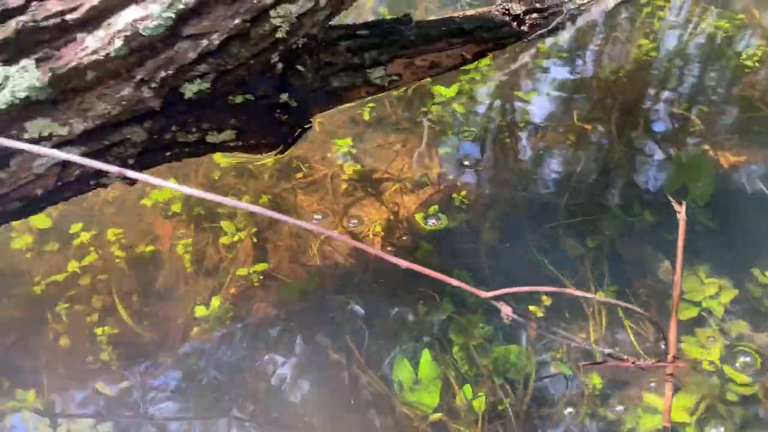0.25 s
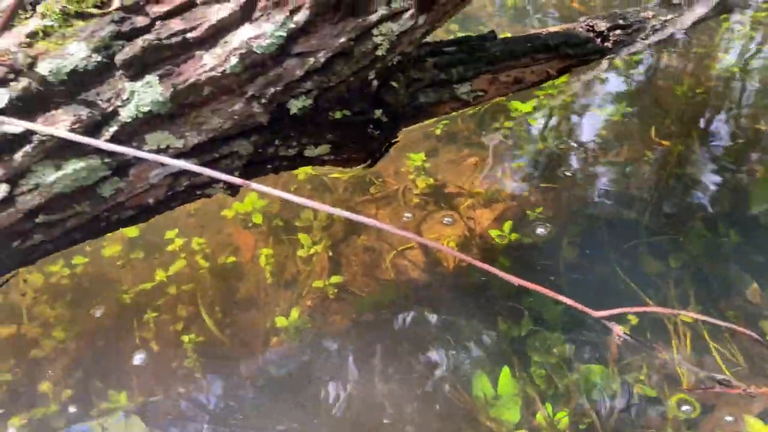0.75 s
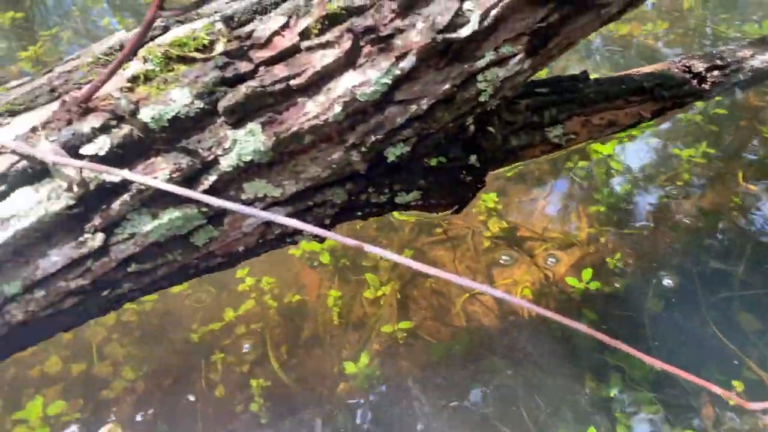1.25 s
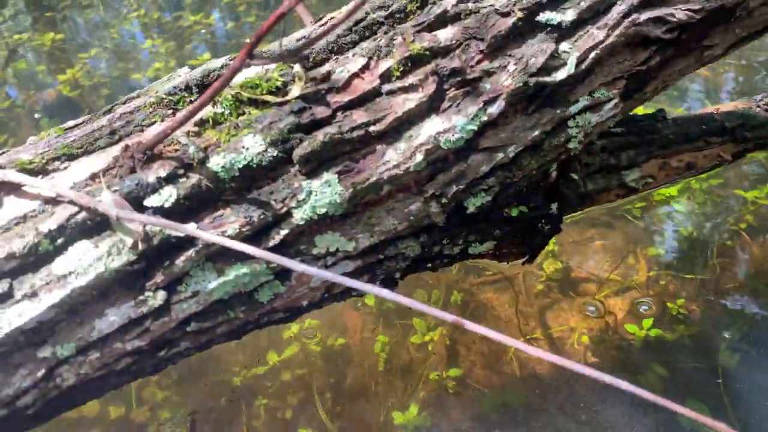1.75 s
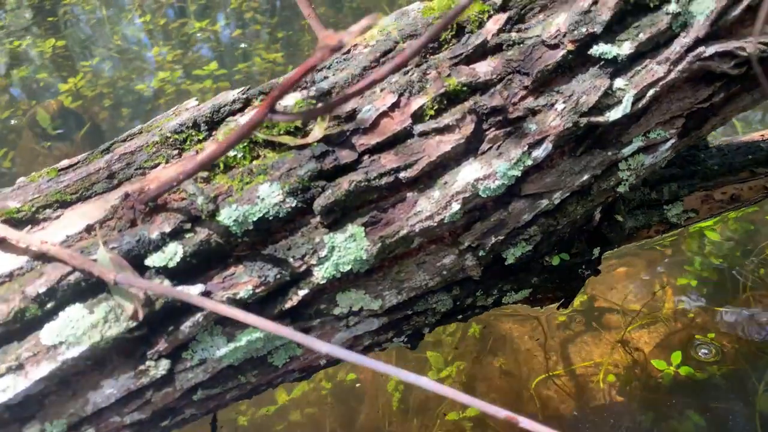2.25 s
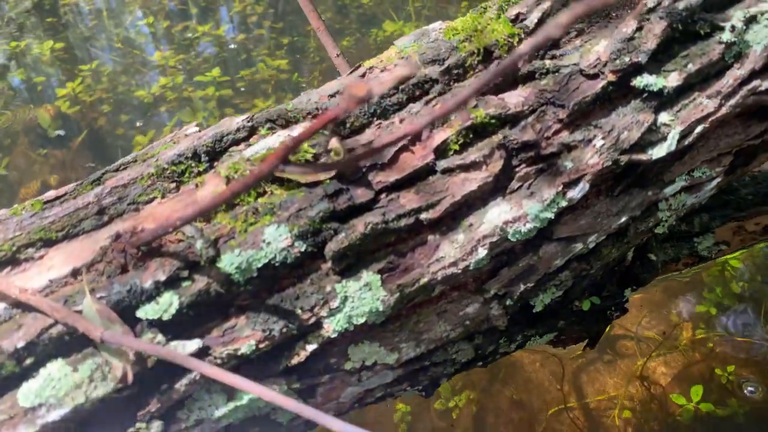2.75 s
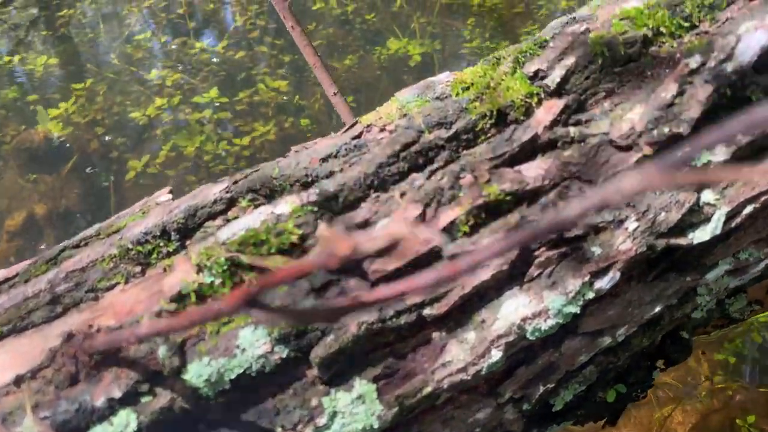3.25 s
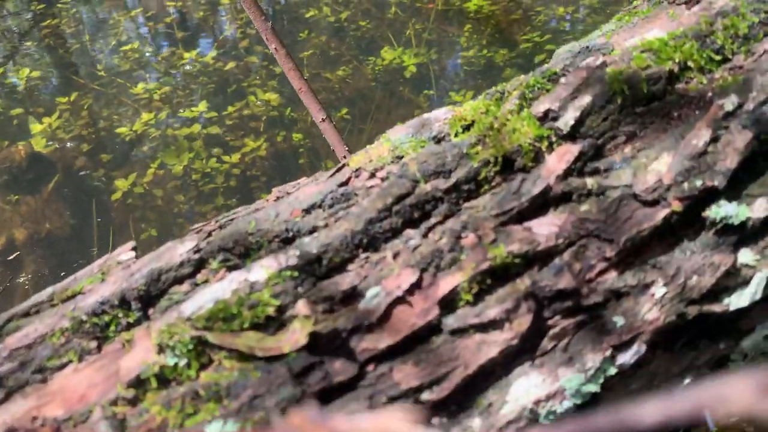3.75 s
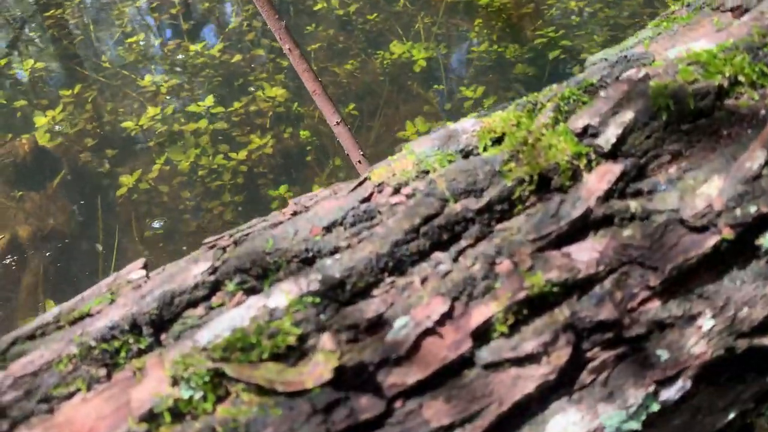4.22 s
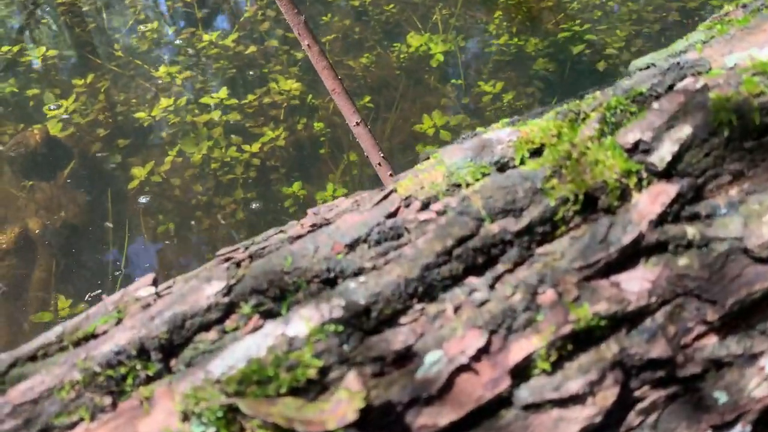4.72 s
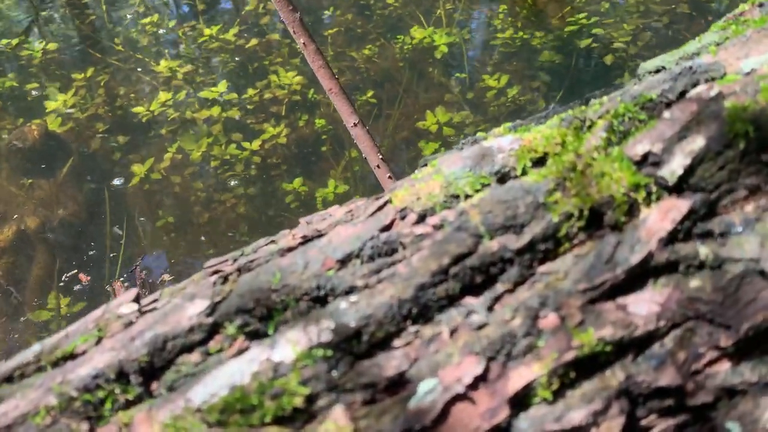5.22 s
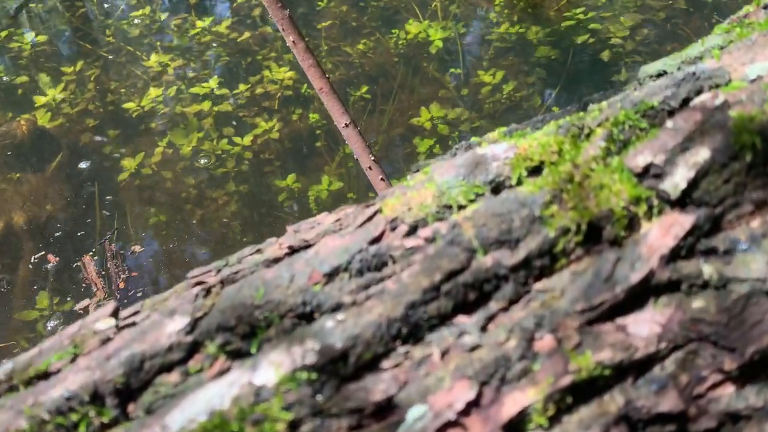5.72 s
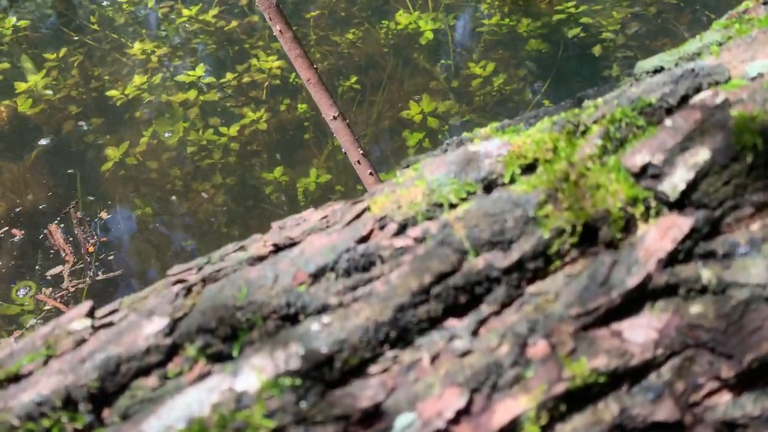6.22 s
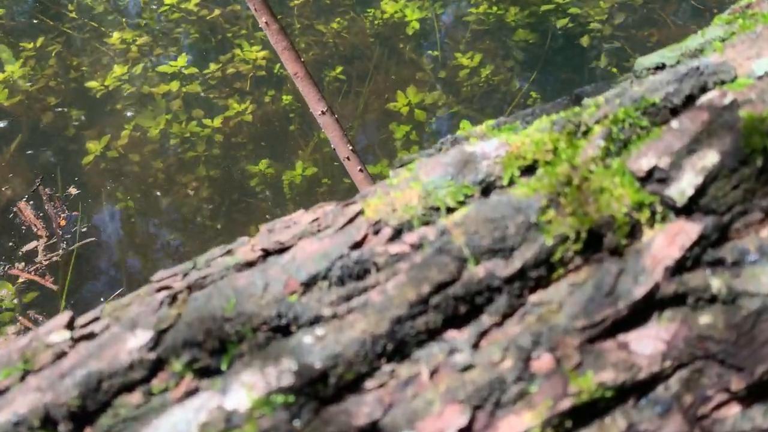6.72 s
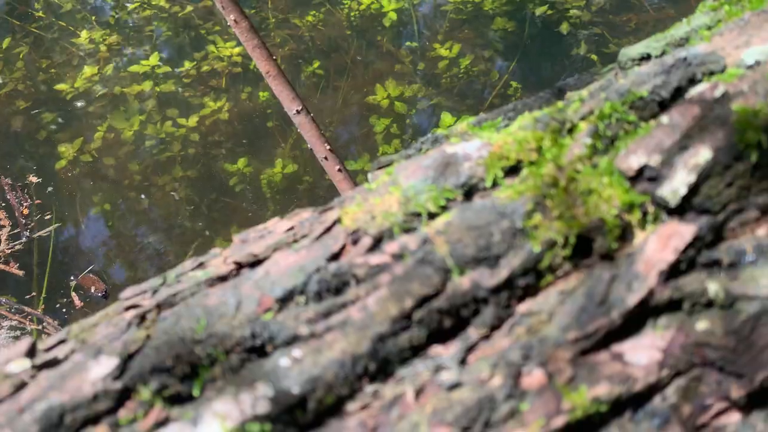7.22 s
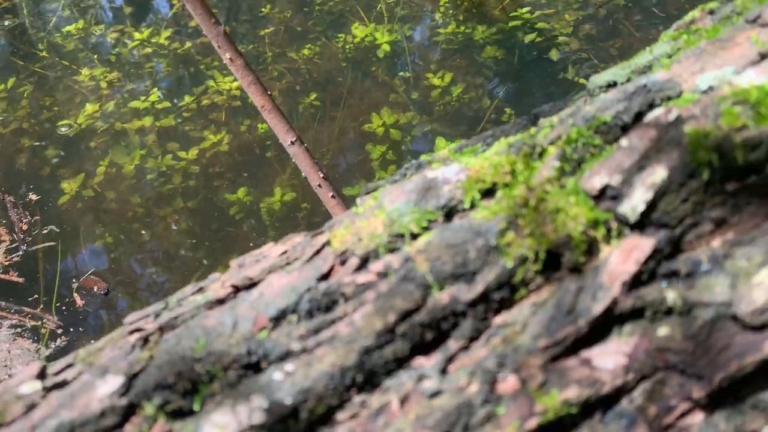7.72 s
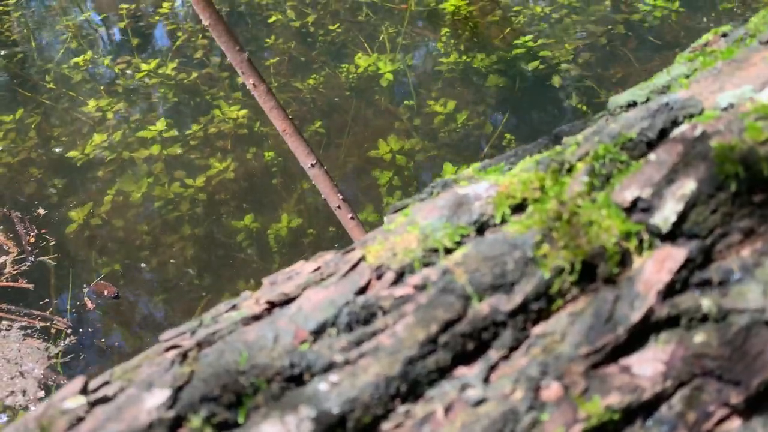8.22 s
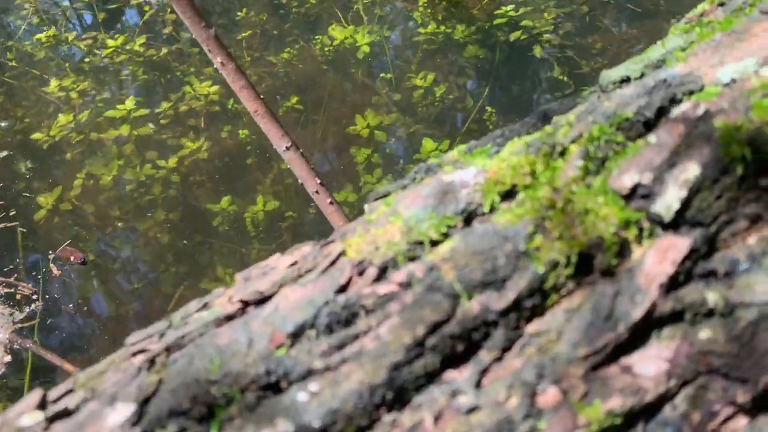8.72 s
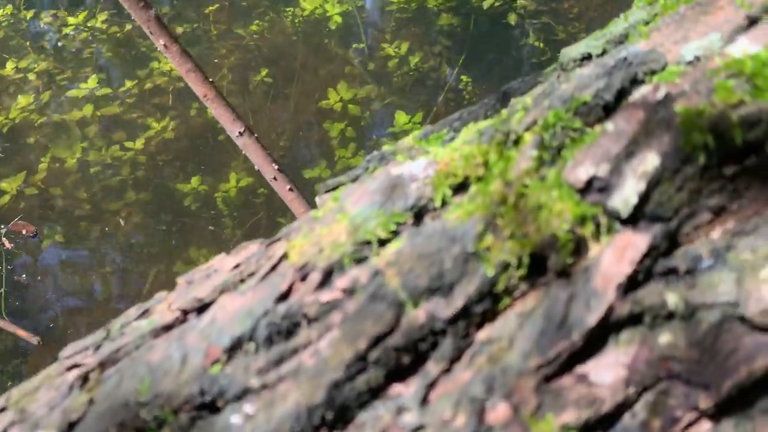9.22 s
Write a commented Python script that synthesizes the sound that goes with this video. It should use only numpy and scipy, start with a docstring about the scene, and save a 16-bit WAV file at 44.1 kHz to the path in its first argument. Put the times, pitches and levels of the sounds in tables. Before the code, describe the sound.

By a swamp pool in daytime, a near cicada pulses steadily, about five bright buzzy throbs a second, over a distant insect sizzle and occasional thin katydid buzzes. Soft water plops come early, then twig ticks and bark rubs around three to five seconds. A loud hollow water cluck pops shortly after seven seconds. Low air and faint rumble lie behind. Close stereo pair outdoors, treble diffuse.

```python
"""Swamp pool by day

A near cicada throbs about five times a second, its tymbal clicks smeared by leaves, over a farther cicada,
a blended chorus and a katydid's grainy high buzz. Water clucks with short ringing tones, splats and drips;
ticks and knocks are ringing bursts and leaves rustle as tiny slips. A far bird gives two fuzzy notes;
wavering drones, faint hiss, air and a low rumble, all but the drones shaped from noise, lie behind."""
import sys
import numpy as np
from scipy import signal
from scipy.fft import rfft, irfft
from scipy.io import wavfile
from scipy.ndimage import uniform_filter1d

SR = 44100
rng = np.random.default_rng(int(sys.argv[2]) if len(sys.argv) > 2 else 0)


def transcribe(u):
    """Save the signal u as a 16-bit wav file named by the first command-line argument.

    u: samples, shape (n,) or (channels, n), limited to [-1, 1]; the rate is SR.
    q: integer samples, one column per channel.
    """
    v = np.clip(np.atleast_2d(u).T, -1, 1)
    q = np.round(v * 32767).astype(np.int16)
    wavfile.write(sys.argv[1], SR, q)


N = 417186
TIME = np.arange(N) / SR
BINS = np.fft.rfftfreq(N, 1 / SR)

# Near cicada's throbs, before the song's own trims: [middle t/s, length t/s, relative level/dB]
THROBS = [(0.098, 0.15, -47.5), (0.338, 0.089, -44.5), (0.55, 0.11, -45), (0.745, 0.091, -44),
          (0.962, 0.091, -43.5), (1.162, 0.068, -43.5), (1.36, 0.12, -44), (1.577, 0.1, -43),
          (1.764, 0.12, -44), (1.981, 0.096, -42.5), (2.192, 0.079, -42.5), (2.406, 0.1, -46),
          (2.61, 0.067, -44), (2.813, 0.079, -41.5), (3.005, 0.073, -40.5), (3.216, 0.097, -43.5),
          (3.422, 0.091, -42.5), (3.635, 0.085, -43.5), (3.84, 0.089, -44), (4.05, 0.095, -44.5),
          (4.261, 0.13, -45.5), (4.473, 0.075, -42), (4.659, 0.075, -41.5), (4.857, 0.073, -43),
          (5.067, 0.088, -43.5), (5.285, 0.087, -43.5), (5.485, 0.1, -44.5), (5.699, 0.085, -42.5),
          (5.888, 0.097, -43), (6.082, 0.093, -42), (6.293, 0.092, -41.5), (6.489, 0.093, -42),
          (6.703, 0.083, -40.5), (6.901, 0.078, -43.5), (7.127, 0.1, -42.5), (7.351, 0.099, -43.5),
          (7.548, 0.077, -41), (7.761, 0.076, -41.5), (7.983, 0.11, -42.5), (8.211, 0.11, -42.5),
          (8.425, 0.085, -42.5), (8.636, 0.091, -42.5), (8.843, 0.092, -43), (9.069, 0.08, -40.5),
          (9.265, 0.086, -43), (9.475, 0.084, -42.5)]
# Near cicada's upper resonance against the lower: [t/s, level difference/dB]
BRIGHTNESS = [(0, 3.5), (1.799, 2.5), (4.2, 0.7), (6.1, 1), (7.7, 0.5), (9.4, 0)]
# Insect colours, shape only: [f/Hz, relative level per Hz/dB]
NEAR_TYMBAL_COLOUR = [(4500, -100.5), (5400, -37), (6100, -13.5), (6400, -12), (6570, -3), (6950, -1.5),
                      (7120, 3), (7170, -6.5), (7240, 8), (7290, -1), (7350, 4.5), (7480, 1), (7900, -4.5),
                      (8040, 2.5), (8160, 1), (8500, -1), (9200, 1), (10000, -6.5), (10600, -12),
                      (11500, -13.5), (12400, -16.5), (13300, -22), (14100, -14.5), (14800, -14),
                      (15700, -13.5)]
FAR_TYMBAL_COLOUR = [(4500, -100), (5750, -31.5), (6150, -18), (6550, -1.5), (7350, -2.5), (8300, 0.5),
                     (10500, -8), (15700, -21)]
CHORUS_COLOUR = [(4500, -101.5), (5700, -22.5), (6100, -28.5), (6550, 1), (7350, -0.5), (7800, 1.5),
                 (8900, 5.5), (10400, -6), (13000, -3.5), (14300, -6), (15700, -17.5)]
KATYDID_COLOUR = [(9000, -75), (10500, 10.5), (11500, 9.5), (12800, 11.5), (14200, 9.5), (15700, 0)]
# Katydid buzzes: [start t/s, end t/s, level/dB]
BUZZES = [(-.3, 0.099, -51.5), (.5, 1.25, -58), (6.355, 7.237, -56), (8.17, 9.22, -54.5)]

# Ringing tones of the water's clucks and plops:
# [t/s, level/dB, starting f/Hz, glide/octaves per s, swell t/s, fade t/s]
CLUCKS = [(2.273, -50, 1050, -5, 0.0024, 0.0041), (2.3, -43, 558, 4, 0.017, 0.013),
          (7.204, -37.5, 532, 3.5, 0.0038, 0.025), (7.206, -23, 993, 6, 0.0087, 0.0047),
          (7.217, -26.5, 1026, 4.5, 0.0079, 0.0046), (7.246, -51, 1070, -5, 0.011, 0.0037),
          (7.311, -50, 1453, 1.5, 0.013, 0.0071), (9.382, -47, 1220, -1, 0.0041, 0.004),
          (9.401, -49.5, 1070, -5, 0.0039, 0.0099)]
# Splats at the water's edge: [t/s, level/dB, pitch factor, tilt/dB per octave]
SPLATS = [(.365, -53, 1.25, -2), (2.278, -44.5, 0.93, -2.5), (2.303, -48.5, 1.22, -5),
          (3.11, -58.5, 1.15, 5), (7.204, -35, 0.972, 6.5), (9.35, -52.5, 1.25, -6), (9.386, -56, 1.04, -8)]
# Resonances of a splat at pitch factor 1: [f/Hz, width f/Hz, relative level/dB, burst fade t/s]
SPLAT_MODES = [(400, 450, 0, 0.018), (766, 120, -8, 0.012), (1210, 680, -14.5, 0.015),
               (262, 36, -6.5, 0.058)]
# Drops into the pool:
# [t/s, impact peak level/dB, impact f/Hz, impact width f/Hz, bubble level before its envelope/dB,
#  bubble f/Hz, echo level against the drop/dB]
DRIPS = [(3.884, -42, 3100, 2200, -41, 2290, -15), (6.517, -41.5, 2960, 860, -47, 2535, -5)]
# Short ticks and knocks of twig, bark and water: [t/s, level/dB, resonance f/Hz, width f/Hz, burst fade t/s]
TICKS = [(2.273, -60, 1250, 1200, 0.0039), (2.764, -62, 1150, 500, .012), (2.962, -58, 1090, 500, 0.013),
         (3.11, -59, 920, 800, 0.021), (3.192, -61, 970, 500, 0.021), (3.412, -62, 3120, 300, 0.0094),
         (3.417, -49, 1310, 450, 0.023), (3.492, -54, 1630, 250, 0.015), (3.952, -52, 920, 400, 0.012),
         (4.096, -53, 1070, 500, .008), (4.14, -61, 1200, 800, 0.008), (4.395, -57.5, 4230, 1900, 0.0025),
         (4.453, -52.5, 1400, 250, 0.01), (4.473, -62, 3000, 700, 0.0089), (7.203, -55, 1910, 1000, 0.013),
         (7.344, -51.5, 750, 396, 0.016), (9.347, -52, 1500, 1000, .002)]
# Leaf and bark strokes: [middle t/s, length t/s, level/dB, ring f/Hz, crisp share/0-1]
RUBS = [(1.905, 0.059, -76.5, 2880, .95), (2.824, 0.27, -66, 1310, 0.02), (3.3, 0.13, -63.5, 1410, 0.1),
        (3.473, 0.14, -53, 1550, 0.03), (3.627, 0.51, -68.5, 1730, 0.04), (3.916, 0.11, -70, 3070, 0.5),
        (4.139, 0.11, -54.5, 1110, 0.01), (4.305, 0.47, -68.5, 1050, 0), (4.462, 0.067, -60, 2210, 0.34),
        (4.867, 0.55, -72.5, 1000, 0.03), (8.06, 0.047, -73, 3080, 0.95), (9.396, 0.12, -70.5, 2180, 0.13)]
# Colours of dull and crisp rubbing, shape only: [f/Hz, relative level per Hz/dB]
DULL_RUB_COLOUR = [(250, -18), (470, 13.5), (760, -10.5), (1020, 13), (1130, 1.5), (1300, 4), (1520, 0),
                   (1640, 1), (1850, -2.5), (2600, -10.5), (3600, -63), (9000, -88)]
CRISP_RUB_COLOUR = [(500, -33), (1100, -5), (1600, -5), (2100, 3.5), (2700, 3), (3400, -5.5), (4200, -9),
                    (5000, -88), (9000, -90)]
# Muting of close sounds around 5 kHz: [f/Hz, gain level/dB]
NEAR_COLOUR = [(3700, -0.5), (4300, -4.5), (4700, -17), (5400, -15), (6200, -1)]

# Far bird's notes: [middle t/s, length t/s, level/dB, settled f/Hz, depth of upward scoop f/Hz]
BIRD_NOTES = [(0.85, 0.14, -77.5, 3780, 580), (2.226, 0.041, -75, 3230, 18)]
# Early and late drones: [middle t/s, length t/s, level/dB, first f/Hz, last f/Hz]
DRONES = [(.7, 1.62, -51.5, 151.7, 150), (7.1, 1.25, -46, 95.82, 99.8)]
# Harmonics of each drone: [multiple of the pitch, relative level/dB]
EARLY_DRONE_PARTIALS = [(1, 3), (2, -16.5)]
LATE_DRONE_PARTIALS = [(1, -4), (2, -0.5), (3, -14.5), (4, -20)]
# Swells of the faint hiss and of a thin band within it: [middle t/s, length t/s, level/dB]
HISS_SWELLS = [(0.977, 0.68, -77.5), (6.556, 0.37, -78.5), (6.98, 0.29, -71.5), (8.16, 0.66, -85),
               (9.462, 0.2, -78)]
AIRY_SWELLS = [(6.8, 0.97, -92), (8.1, 0.89, -79)]
# Background colours, shape only: [f/Hz, relative level per Hz/dB]
HISS_COLOUR = [(600, 1), (1100, 11.5), (1500, 6), (1850, 5.5), (2300, 5.5), (2900, -11.5), (4500, -53),
               (9000, -55)]
AIR_COLOUR = [(50, -25.5), (100, -1), (135, 1.5), (200, -1), (240, -4.5), (310, -7.5), (400, -13),
              (550, -17), (850, -25.5), (1300, -48), (2400, -49.5), (3800, -43), (4700, -60.5),
              (9000, -84.5)]
RUMBLE_COLOUR = [(15, -41.5), (25, -18.5), (36, -14), (47, -4.5), (59, 3.5), (72, -2), (90, 2.5), (115, -8),
                 (160, -22.5), (400, -91.5)]
# Slow course of the far rumble: [t/s, level/dB]
RUMBLE_LEVEL = [(0, -49.5), (4.9, -51), (5.7, -48.5), (9.46, -50.5)]

# How alike the two ports hear a sound: [f/Hz, likeness/0-1, clipped at 1]
LIKENESS = [(60, 1), (200, 0.98), (330, 0.91), (550, 0.022), (2500, 0.65), (4500, 1), (6500, 0.94),
            (11000, 1), (13300, .99), (15000, 0.98)]
# Phase by which the left port leads: [f/Hz, phase/radians]
PORT_PHASE = [(0, 0), (430, .05), (700, 1.2), (2300, 0), (4600, 3.1), (6200, 6.1), (7000, 6.35),
              (8950, 9.4), (10700, 12.4), (11500, 12.8), (13200, 15.7), (15000, 18.7), (16000, 18.9)]


def cicada(level_db=1.27, lead_s=0.0016, edge_s=0.006, slower_fall=1.7, climb_db_per_s=24, rest_db=-64,
           click_db=-6, scatter_db=-5.0, echo_db=-7, echo_t60=0.56):
    """The abdomen lifts at each throb and lets the tymbal clicks ring out; the trees smear them."""
    lift = np.zeros(N)
    t = TIME[:SR // 5] - TIME[SR // 10]
    for middle, length, db in THROBS:
        throb = gain_of(db + level_db + climb_db_per_s * t) * swell(t, length, edge_s, slower_fall)
        add(lift, middle + t[0] - lead_s, throb)
    opening = (gain_of(rest_db) + lift) * tremble(rate=47, depth_db=0.5)
    song = gain_of(click_db) * opening * coloured(tymbal_clicks(), NEAR_TYMBAL_COLOUR)
    # leaves scatter part of the sound at once; the echo's power trails behind each throb
    keep = gain_of(-120 / (echo_t60 * SR))  # power falls 60 dB over echo_t60
    trail = signal.lfilter([1 - keep], [1, -keep], opening ** 2, zi=[np.mean(opening ** 2)])[0]
    scattered_power = (gain_of(scatter_db) * opening) ** 2
    echo_power = gain_of(echo_db) ** 2 * abs(trail)
    smear = diffuse(NEAR_TYMBAL_COLOUR, np.sqrt(scattered_power + echo_power))
    heard = brightened(ports(song, np.zeros(N)) + smear)
    return patchy(heard, patch_hz=150, patch_s=.055, depth_db=2.5)


def tymbal_clicks(cycle_hz=100, drift=.005, rib_gap_s=.00133, jitter_s=.00009, rib_fade_db=3.5,
                  uneven_db=1.0, weaker_db=4.5, ribs=4):
    """Two tymbals, one a little weaker, buckle in turn, each rib by rib."""
    turns = np.cumsum(2 * cycle_hz * (1 + drift * wander(4))) / SR
    starts = TIME[1:][np.diff(np.floor(turns)) > 0]
    late, size = rng.standard_normal((2, len(starts), ribs))
    rib = np.arange(ribs)
    side = np.arange(len(starts))[:, None] % 2
    at = np.round((starts[:, None] + rib * rib_gap_s + jitter_s * late) * SR).astype(int)
    strength = gain_of(uneven_db * size - rib_fade_db * rib - weaker_db * side)
    return np.bincount(np.maximum(at, 0).ravel(), strength.ravel(), N)[:N]


def brightened(x, split_hz=8050, blend_hz=350):
    """The balance of the cicada's two resonances shifts slowly over time, with a quicker waver."""
    t, tilt_db = np.transpose(BRIGHTNESS)
    # half the difference lifts the upper part, half lowers the rest
    tilt = gain_of(np.interp(TIME, t, tilt_db) / 2) * tremble(rate=5.6, depth_db=0.74)
    upper = irfft(rfft(x) * (.5 + .5 * np.tanh((BINS - split_hz) / blend_hz)), N)
    return upper * tilt + (x - upper) / tilt


def second_cicada(level_db=-56, throbs_per_s=5.1, drift=0.07, length_s=0.058, edge_s=0.021):
    """A farther cicada throbs at its own pace, in and out of step with the near one."""
    turns = rng.random() + np.cumsum(throbs_per_s * (1 + drift * wander(0.97))) / SR
    from_middle = (turns - np.round(turns)) / throbs_per_s
    return diffuse(FAR_TYMBAL_COLOUR, gain_of(level_db) * swell(from_middle, length_s, edge_s))


def chorus(level_db=-52, swell_db=2.8):
    """Distant cicadas merge into one uneven sizzle."""
    sizzle = diffuse(CHORUS_COLOUR, gain_of(level_db) * tremble(rate=0.76, depth_db=swell_db))
    return patchy(sizzle, patch_hz=300, patch_s=.05, depth_db=2.5)


def katydid(rise_s=0.24, stop_s=0.074, stroke_hz=70, uneven=0.26, depth=0.35):
    """Uneven wing strokes make a thin, grainy buzz that swells and then stops."""
    level = np.zeros(N)
    for start, end, db in BUZZES:
        level += gain_of(db) * np.clip((TIME - start) / rise_s, 0, 1) * np.clip((end - TIME) / stop_s, 0, 1)
    stroke_turns = np.cumsum(stroke_hz * (1 + uneven * wander(30))) / SR
    strokes = 1 + depth * np.sin(2 * np.pi * stroke_turns)
    return diffuse(KATYDID_COLOUR, level * strokes)


def clucks(rough_db=2.0, wobble=0.0094):
    """Each row is one unsteady ringing tone of a cluck; several may sound together."""
    out = np.zeros(N)
    t = TIME[:SR // 4]
    shake = tremble(rate=210, depth_db=rough_db)
    bend = 1 + wobble * wander(130)
    for start, db, hz, glide, rise, fade in CLUCKS:
        here = np.minimum(round(start * SR) + np.arange(len(t)), N - 1)
        shape = np.sin(np.pi / 2 * np.minimum(t / rise, 1)) ** 2 * np.exp(-np.maximum(t - rise, 0) / fade)
        turns = np.cumsum(hz * bend[here] * 2 ** (glide * t)) / SR
        add(out, start, gain_of(db) * shape * shake[here] * np.sin(2 * np.pi * turns))
    return out


def splats():
    """Every splat rings the same few resonances, at its own pitch and tilt."""
    out = np.zeros(N)
    pivot_hz = SPLAT_MODES[0][0]  # the tilt leaves this resonance unchanged
    for start, db, pitch, tilt_db in SPLATS:
        for hz, width, mode_db, fade in SPLAT_MODES:
            tilted_db = tilt_db * np.log2(hz / pivot_hz)
            add(out, start, knock(db + mode_db + tilted_db, hz * pitch, width, fade))
    return out


def drips(bubble_swell_s=0.0009, bubble_fade_s=0.0064, echo_t60=.13):
    """A sharp impact, then a small bubble rings; the bank throws both back."""
    out = np.zeros(N)
    t = TIME[:SR // 10]
    for start, impact_db, impact_hz, width, bubble_db, bubble_hz, echo_db in DRIPS:
        drop = np.zeros(N)
        impact = resonate(1.0 * (t == 0), impact_hz, width)
        shape = (1 - np.exp(-t / bubble_swell_s)) * np.exp(-t / bubble_fade_s)
        bubble = shape * np.sin(2 * np.pi * bubble_hz * t)
        add(drop, start, gain_of(impact_db) * impact / abs(impact).max() + gain_of(bubble_db) * bubble)
        out += drop + gain_of(echo_db) * woods(drop, t60=echo_t60)
    return out


def ticks(snap_hz=3230, snap_width_hz=1500, snap_fade_s=.0014, snap_db=-5, snap_db_per_octave=9):
    """A snap with a brief ring; the higher the ring, the stronger its snap."""
    out = np.zeros(N)
    for start, db, hz, width, fade in TICKS:
        this_snap_db = db + snap_db + snap_db_per_octave * np.log2(hz / snap_hz)
        snap = knock(this_snap_db, snap_hz, snap_width_hz, snap_fade_s)
        add(out, start, knock(db, hz, width, fade) + snap)
    return out


def friction(slips_per_s=900, smooth=.9):
    """Sparse slips of random sign over the smoother noise of rubbing."""
    slips = (rng.random(N) < slips_per_s / SR) * rng.choice([-1, 1], N)
    return evened(slips) + smooth * rng.standard_normal(N)


def rustle(edge_share=0.17, patchy_db=2.0, ring_drift=0.087, ring_width_hz=140, ring_db=-11):
    """Slips of leaf and bark, dull or crisp, ring the rubbed piece; its pitch shifts with the contact."""
    strokes = [gain_of(db) * swell(TIME - middle, length, edge_share * length)
               for middle, length, db, _, _ in RUBS]
    power = np.array(strokes) ** 2
    _, _, _, ring_hz, crisp = np.transpose(RUBS)
    crisp = np.clip(crisp, 0, 1)
    # the strongest stroke at each moment sets the pitch of the ring
    pitch = ring_hz[power.argmax(0)] * (1 + ring_drift * wander(13))
    ring = evened(resonate(friction(), pitch, ring_width_hz))
    dull = np.sqrt((1 - crisp) @ power) * coloured(friction(), DULL_RUB_COLOUR)
    sharp = np.sqrt(crisp @ power) * coloured(friction(), CRISP_RUB_COLOUR)
    rubbed = dull + sharp + gain_of(ring_db) * np.sqrt(power.sum(0)) * ring
    return patchy(rubbed * tremble(rate=19, depth_db=patchy_db), patch_hz=300, patch_s=.04, depth_db=1.9)


def nearby(x, right_db=1, echo_db=-14):
    """Close sounds reach the right port a little later; the bank gives a short, faint echo."""
    x = irfft(rfft(x) * gain_of(read(NEAR_COLOUR)), N)
    late = np.minimum(2 * np.pi * BINS * .0003, 1.15)  # 0.3 ms in the bass, then a constant phase in radians
    right = gain_of(right_db) * irfft(rfft(x) * np.exp(-1j * late), N)
    echo = np.array([woods(x, t60=.12), woods(x, t60=.12)])
    return np.array([x, right]) + gain_of(echo_db) * echo


def bird(width_hz=260, scoop_s=0.018, edge_share=0.16):
    """Each note scoops up to its pitch; distance blurs it into a fuzzy whistle."""
    out = np.zeros(N)
    for middle, length, db, hz, scoop_hz in BIRD_NOTES:
        since_start = np.maximum(TIME - middle + length / 2, 0)
        pitch = hz - scoop_hz * np.exp(-since_start / scoop_s)
        whistle = evened(resonate(rng.standard_normal(N), pitch, width_hz))
        out += gain_of(db) * swell(TIME - middle, length, edge_share * length) * whistle
    return out


def drone(row, partials, edge_s=0.15, glide_s=0.2, waver=0.0046, flutter_db=1.1):
    """A far, wavering hum of harmonics fades in, slides to its last pitch and fades out."""
    middle, length, db, first_hz, last_hz = row
    hz = first_hz + (last_hz - first_hz) * (.5 + .5 * np.tanh((TIME - middle) / glide_s))
    turns = np.cumsum(hz * (1 + waver * wander(21.3))) / SR
    level = gain_of(db) * swell(TIME - middle, length, edge_s) * tremble(rate=11.0, depth_db=flutter_db)
    hum = sum(gain_of(part_db) * np.sin(2 * np.pi * round(k) * turns) for k, part_db in partials)
    return level * evened(hum)


def hiss(rest_db=-80.5, edge_s=0.089, airy_hz=2220, airy_width_hz=430):
    """Coloured noise comes and goes, with a thin resonant band of its own swells."""
    swells = sum(gain_of(db) * swell(TIME - middle, length, edge_s) for middle, length, db in HISS_SWELLS)
    airy = sum(gain_of(db) * swell(TIME - middle, length, edge_s) for middle, length, db in AIRY_SWELLS)
    left, right = (airy * evened(resonate(rng.standard_normal(N), airy_hz, airy_width_hz)) for _ in range(2))
    level = (gain_of(rest_db) + swells) * tremble(rate=13, depth_db=3.1)
    return ports(left, right) + diffuse(HISS_COLOUR, level)


def woodland_air(level_db=-50.5):
    """The air of the woods: low, wavering noise."""
    return diffuse(AIR_COLOUR, gain_of(level_db) * tremble(rate=6.7, depth_db=1.0))


def rumble():
    """Far, very low noise on a slow level curve."""
    level = gain_of(np.interp(TIME, *np.transpose(RUMBLE_LEVEL)))
    return diffuse(RUMBLE_COLOUR, level * tremble(rate=1.7, depth_db=1.0))


def diffuse(spectrum, level):
    """Many far sources blended into noise, on a level curve."""
    left, right = (level * coloured(rng.standard_normal(N), spectrum) for _ in range(2))
    return ports(left, right)


def ports(shared, other, bass_db=.5):
    """Two close ports hear nearly the same sound, the treble out of step, more bass at the right."""
    same = np.clip(read(LIKENESS), 0, 1)
    lag = np.exp(-1j * np.interp(BINS, *np.transpose(PORT_PHASE)))
    right = (same * rfft(shared) + np.sqrt(1 - same ** 2) * rfft(other)) * lag
    right = right * gain_of(bass_db * (BINS < 500))
    return np.array([shared, irfft(right, N)])


def woods(x, t60):
    """Ringing and echoes of wood and leaves: sparse taps of random sign that die away."""
    t = TIME[:SR // 2]
    taps = rng.standard_normal(len(t)) * (rng.random(len(t)) < .1) * gain_of(-60 * t / t60)
    return signal.oaconvolve(x, taps / np.linalg.norm(taps))[:N]


def patchy(x, patch_hz, patch_s, depth_db):
    """Each part of the range swells and sinks on its own."""
    hz, t, z = signal.stft(x, SR, nperseg=512, noverlap=384)
    field = rng.standard_normal((len(hz), len(t)))
    field = uniform_filter1d(field, max(round(patch_hz / hz[1]), 1), axis=0)
    field = evened(uniform_filter1d(field, max(round(patch_s / t[1]), 1), axis=1))
    return signal.istft(z * evened(gain_of(depth_db * field)), SR, nperseg=512, noverlap=384)[1][..., :N]


def knock(db, hz, width, fade):
    """A short burst of contact noise rings one broad resonance."""
    t = TIME[:SR // 4]
    burst = rng.standard_normal(len(t)) * np.exp(-t / fade)
    for _ in range(2):
        burst = resonate(burst, hz, 1.08 * width)
    return gain_of(db) * burst * np.sqrt(fade * SR / 2) / np.linalg.norm(burst)


def resonate(x, hz, width):
    """A steep resonance of gain 1 that can follow a pitch curve."""
    turn = np.exp(2j * np.pi * np.cumsum(hz * np.ones(len(x))) / SR)
    r = np.exp(-np.pi * width / SR)
    # shift the pitch down to zero, smooth, and shift it back
    smoothed = signal.lfilter([(1 - r) ** 2], [1, -2 * r, r * r], x / turn + 1e-18)
    return 2 * (turn * smoothed).real


def swell(t, length, edge, slower_fall=1):
    """Rise, hold and fall around t = 0, between 0 and 1."""
    rise = .5 + .5 * np.tanh((length / 2 + t) / (2 * edge))
    return rise * (.5 + .5 * np.tanh((length / 2 - t) / (2 * edge * slower_fall)))


def tremble(rate, depth_db):
    """A gain that wavers about 1."""
    return gain_of(depth_db * wander(rate))


def wander(rate):
    """Slow chance of rms 1, up to about rate changes a second."""
    return evened(irfft(rfft(rng.standard_normal(N)) * np.exp(-(BINS / rate) ** 2), N))


def coloured(x, spectrum):
    """Filters x by a colour table, then sets it to rms 1."""
    return evened(irfft(rfft(x) * gain_of(read(spectrum)), N))


def read(points):
    """A table over log frequency, read at every bin."""
    hz, value = np.transpose(points)
    return np.interp(np.log(BINS + 1), np.log(hz + 1), value)


def evened(x):
    """Scales to rms 1."""
    return x / np.sqrt(np.mean(x ** 2) + 1e-20)


def gain_of(db):
    """Decibels to amplitude."""
    return 10 ** (np.asarray(db) / 20)


def add(mix, start, sound):
    """Adds a sound into the mix at a start time in seconds."""
    part = mix[max(round(start * SR), 0):][:len(sound)]
    part += sound[:len(part)]


def scene():
    """Insects, small near sounds, and the far background."""
    insects = cicada() + second_cicada() + chorus() + katydid()
    near = nearby(clucks() + splats() + drips() + ticks() + rustle())
    drones = drone(DRONES[0], EARLY_DRONE_PARTIALS) + drone(DRONES[1], LATE_DRONE_PARTIALS)
    return insects + near + bird() + drones + hiss() + woodland_air() + rumble()


def record(dry, edge_hz=15800):
    """A steep low-pass limits the band."""
    edge = signal.firwin(1023, edge_hz, window=("kaiser", 9), fs=SR)
    return signal.oaconvolve(dry, edge[None], "same")


dry = scene()
out = record(dry)
transcribe(out)
```